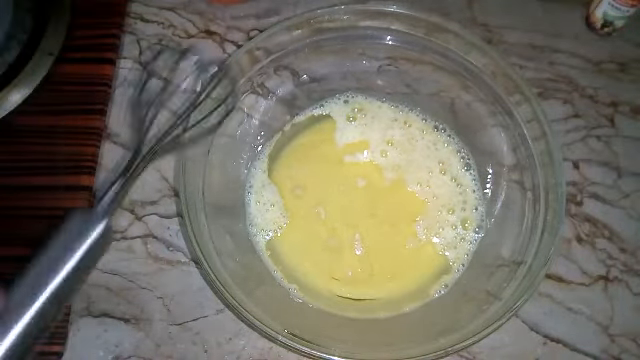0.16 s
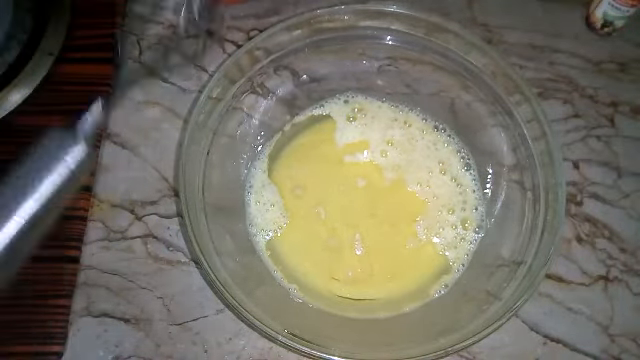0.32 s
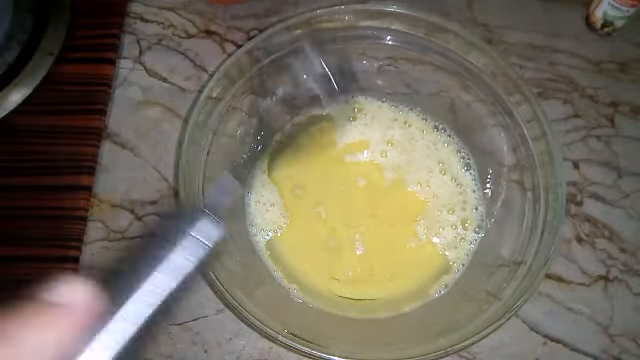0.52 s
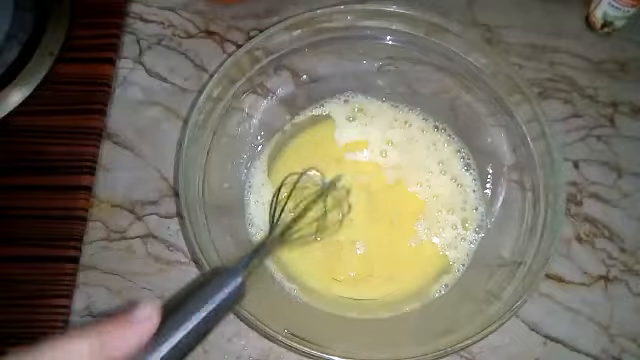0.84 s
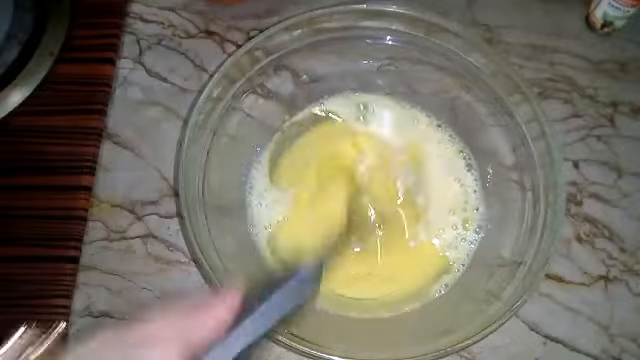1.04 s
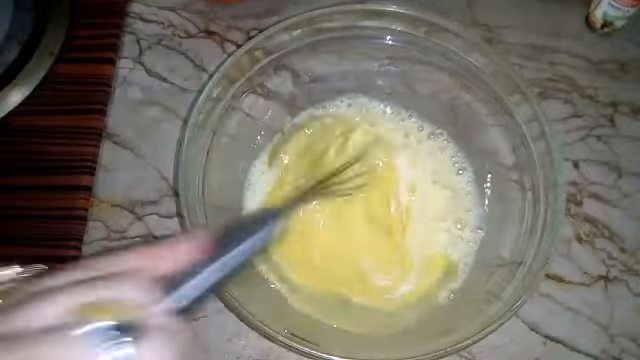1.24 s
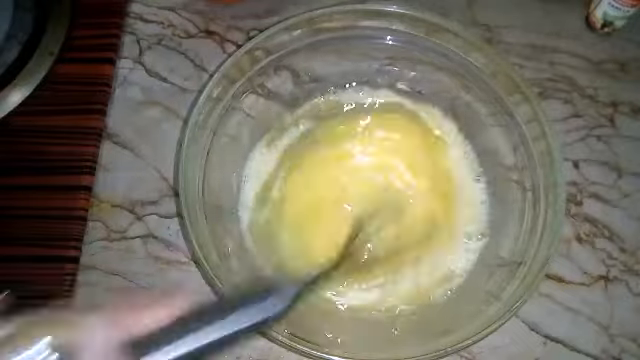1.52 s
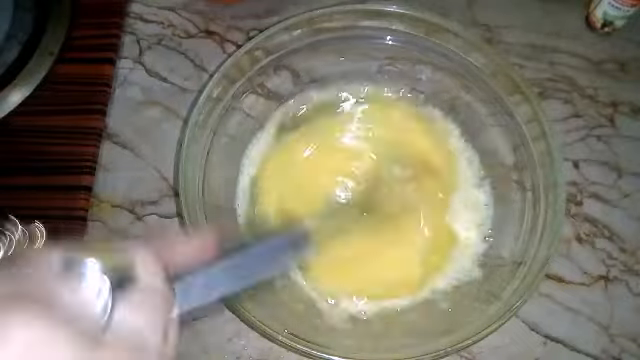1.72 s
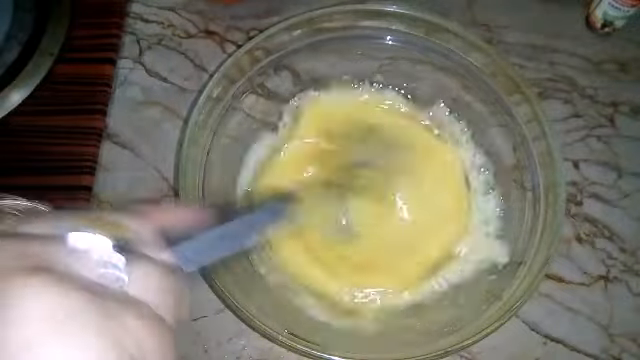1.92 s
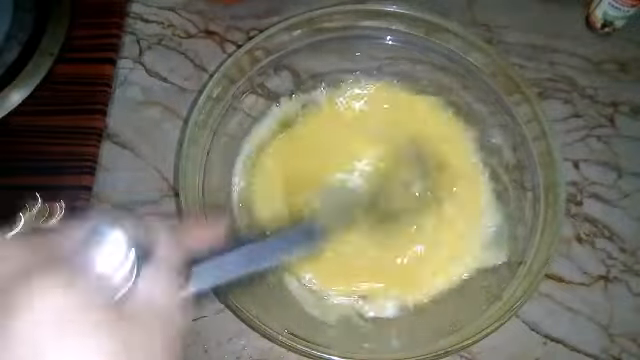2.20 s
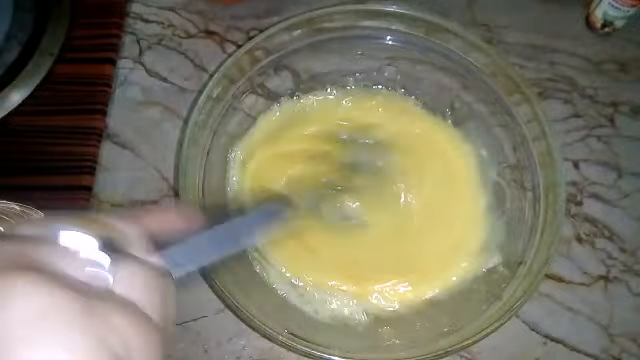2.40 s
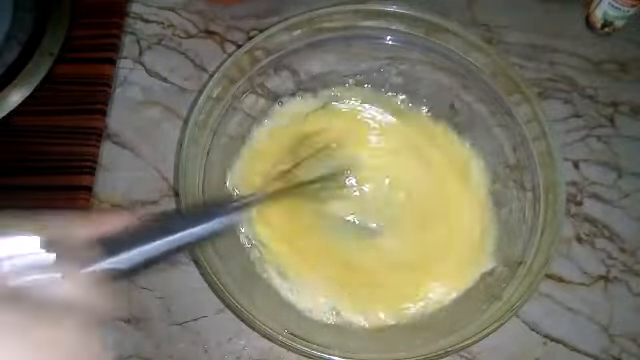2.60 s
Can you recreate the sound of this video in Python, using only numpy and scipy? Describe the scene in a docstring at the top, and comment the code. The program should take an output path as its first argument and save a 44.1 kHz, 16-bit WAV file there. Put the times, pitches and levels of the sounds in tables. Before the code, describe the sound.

A metal whisk beats eggs in a glass bowl, close up and nearly mono. Around 0.2 s the wires knock the rim with a bright, buzzing ring, touching again faintly near 0.4 s. Small ticks at 0.6-0.7 s and glassy taps near 0.95 s follow. From 1.2 s wet, wiry strokes strengthen, with irregular ticks and plops after 2 s, over faint hum in a small kitchen.

```python
"""A steel whisk knocks on the rim of a glass bowl, touches it again, dips into eggs and beats them.
Decaying modes make the ring; filtered random contacts make the clatter, ticks, taps and drag.
Damped tones make the pings of the wire loops, the bubbles and the plops of trapped air.
A small kitchen answers with decaying noise; room noise and slightly wavering partials of an appliance
hum lie below. It is heard close up and nearly in mono."""
import sys
import numpy as np
from scipy import signal
from scipy.fft import rfft, irfft, next_fast_len
from scipy.io import wavfile
from scipy.ndimage import map_coordinates

SR = 44100
rng = np.random.default_rng(int(sys.argv[2]) if len(sys.argv) > 2 else 0)


def master(y):
    """Save y as 16-bit WAV."""
    cut = np.clip(np.atleast_2d(y).T, -1, 1)
    pcm = np.round(cut * 32767)  # scale
    wavfile.write(sys.argv[1], SR, pcm.astype(np.int16))


N = 121275  # length in samples

# relative spectrum of the ticks and drag: frequency_hz, level_db
WIRE_SPECTRUM = [(300, -38.5), (1100, -6.5), (1900, -54), (2450, 0.5), (2850, -7), (3800, 4), (4500, -3.5),
                 (6000, 3), (6600, 8), (7400, -6.5), (9000, -21), (11000, -53)]


def amp(db):
    """Level law: decibels to amplitude ratio."""
    return 10 ** (np.asarray(db) / 20)


def unit(x):
    """Power normalisation: scale to rms 1."""
    return x / np.sqrt(np.mean(x ** 2) + 1e-20)


def since(start_s):
    """Elapsed time in seconds since start_s, zero before it."""
    return np.maximum(np.arange(N) / SR - start_s, 0)


def wobble(rate):
    """Slow random modulation: a smooth curve through rate random knots a second."""
    knots = rng.standard_normal(int(N * rate / SR) + 4)
    return map_coordinates(knots, [since(0) * rate])


def colour(x, points):
    """Minimum-phase filtering through (frequency_hz, level_db) points, keeping the power of white noise."""
    m = 2 * next_fast_len(N)
    hz, db = np.transpose(points)
    log_hz = np.log(np.fft.rfftfreq(m, 1 / SR) + 1)
    gain = unit(amp(np.interp(log_hz, np.log(hz + 1), db)))
    # folding the cepstrum onto positive time makes the filter causal
    cepstrum = irfft(np.log(gain + 1e-6))
    cepstrum[1:m // 2] *= 2
    cepstrum[m // 2 + 1:] = 0
    return irfft(rfft(x, m) * np.exp(rfft(cepstrum)))[:N]


def crackle(rate, spread_db):
    """Shot noise: random contacts, rate a second, of uneven size and either sign, rms 1."""
    size = amp(spread_db * np.minimum(rng.exponential(size=N), 4))
    contact = rng.random(N) < rate / SR
    return unit(contact * size * rng.choice([-1, 1], N))


def damped_tone(t, hz, rise, t60, attack):
    """Damped oscillator: a decaying sine whose pitch climbs by the fraction rise each second."""
    tone = np.sin(2 * np.pi * hz * t * (1 + rise * t / 2))
    return tone * amp(-60 * t / t60) * (1 - np.exp(-t / attack))


def swells(rows):
    """Power summation of pushes, each growing exponentially to its crest and falling away quickly."""
    RELEASE_S = 0.013  # time constant
    t = since(0)
    power = 0
    for crest_s, db, swell_s in rows:
        shape = np.exp(np.minimum((t - crest_s) / swell_s, (crest_s - t) / RELEASE_S))
        power = power + (amp(db) * shape) ** 2
    return np.sqrt(power)


def stirring():
    """Steady excitation: the constant envelope of a faint churn once the whisk is in."""
    STIR_FROM_S, STIR_DB = 1, -65.5
    return (since(STIR_FROM_S) > 0) * amp(STIR_DB)


def background():
    """Additive and filtered-noise synthesis: wavering hum partials of an appliance over room noise."""
    AIR_DB = -58  # rms level
    # relative spectrum of the room noise: frequency_hz, level_db
    air_spectrum = [(25, -13.5), (60, -9), (108, 1.5), (330, -10.5), (520, -9), (1050, -11.5), (2100, -20),
                    (6600, -17), (7800, -33), (9000, -60.5)]
    # partials of the appliance: pitch_hz, rms_level_db, waver_depth (0-1)
    hum_partials = [(99.7, -63, 0.1), (148.1, -69, 0), (524.3, -65, 0.25)]
    hum = np.zeros(N)
    for hz, db, waver in hum_partials:
        level = amp(db) * np.sqrt(2) * (1 + waver * wobble(12.08))
        hum += level * np.sin(2 * np.pi * hz * since(0) + 0.59 * wobble(5.82))
    return hum + amp(AIR_DB) * colour(rng.standard_normal(N), air_spectrum)


def kitchen(x):
    """Reverberation by convolution with decaying noise: the short, slightly dull answer of counter and walls."""
    KITCHEN_T60_S = 0.081
    # relative response of the room: frequency_hz, level_db
    wall_response = [(200, -5), (6500, -1), (15000, -11)]
    t = np.arange(SR // 2) / SR
    tail = rng.standard_normal(len(t)) * amp(-60 * t / KITCHEN_T60_S) * (t > .002)
    echo = signal.fftconvolve(x, tail / np.linalg.norm(tail))[:N]
    return colour(echo, wall_response)


def froth(centre_hz):
    """Superposed bubble resonances: a swarm of small rising tones around one pitch, rms 1."""
    BUBBLES_PER_S, BUBBLE_CYCLES = 600, 31  # the cycles fall by 60 dB
    BUBBLE_SPREAD = 0.46  # largest pitch deviation either way, natural log of the ratio
    swarm, t = np.zeros(N + SR), np.arange(SR // 20) / SR
    for when, pitch, size in rng.random((int(BUBBLES_PER_S * N / SR), 3)):
        hz = centre_hz * np.exp(BUBBLE_SPREAD * (2 * pitch - 1))
        bubble = damped_tone(t, hz, 9.3, BUBBLE_CYCLES / hz, 0.0004)
        swarm[int(when * N):][:len(t)] += amp(10 * size) * bubble
    return unit(swarm[:N])


def liquid():
    """Bubble resonance: churned egg, gurgles as it folds into the hollow, and larger plops of air."""
    BUBBLE_HZ, SLOSH_DB = 784, -6  # the slosh is relative to the stirring envelope
    GURGLE_SWELL_S, PLOP_RISE_S = 0.022, 0.0059  # time constants
    # egg folding back into the hollow: crest_s, level_db, bubble_pitch_hz
    gurgle_events = [(1.929, -55.5, 870), (1.943, -53.5, 1770), (2.117, -49, 1640), (2.715, -59, 920)]
    # air pockets: start_s, level_db, pitch_hz, pitch_rise_per_s, t60_s
    air_pockets = [(0.856, -46, 1010, 2.8, 0.097), (2.048, -35, 1377, 19, 0.048),
                   (2.113, -24, 780, 3.7, 0.021), (2.355, -25, 716, 4.7, 0.034),
                   (2.463, -34.5, 1133, 1.8, 0.041), (2.565, -20, 2905, 14, 0.027)]
    sound = amp(SLOSH_DB) * stirring() * froth(BUBBLE_HZ)
    for crest_s, db, hz in gurgle_events:
        sound += swells([(crest_s, db, GURGLE_SWELL_S)]) * froth(hz)
    for start_s, db, hz, rise, t60 in air_pockets:
        sound += amp(db) * damped_tone(since(start_s), hz, rise, t60, PLOP_RISE_S)
    return sound


def wire_loops(x):
    """Resonant filtering: contacts given the broad colour of ticks and drag, one resonance ringing on."""
    LOOP_HZ, LOOP_Q, LOOP_GAIN = 3920, 15.4, 0.56
    b, a = signal.iirpeak(LOOP_HZ, LOOP_Q, fs=SR)
    return colour(x + LOOP_GAIN * signal.lfilter(b, a, x), WIRE_SPECTRUM)


def drag():
    """Friction as many small impacts: wet clicks and brief loop pings as the whisk pulls through foam."""
    CLICKS_PER_S, CLICK_SPREAD_DB = 1200, 0.5
    PINGS_PER_S, PING_T60_S, PING_DB = 420, 0.041, -1.5  # level relative to the clicks
    PING_HZ, PING_SPREAD = (3675, 5440, 6520), 0.1506  # three clusters, largest relative deviation
    PING_SIZE_DB, CLUMP_DB = 15, 2.8  # range of ping sizes; depth of the random level changes
    # pulls of the whisk through the egg: crest_s, level_db, swell_time_s
    pulls = [(1.185, -54, 0.07), (1.325, -48, 0.03), (1.46, -48, 0.073), (1.555, -48.5, 0.04),
             (1.65, -46, 0.048), (1.775, -50.5, 0.092), (1.9, -44, 0.096), (2.115, -45, 0.2),
             (2.24, -44, 0.05), (2.33, -41.5, 0.05), (2.475, -42, 0.081), (2.555, -42, 0.07),
             (2.74, -42, 0.081)]
    pings, t = np.zeros(N + SR), np.arange(SR // 10) / SR
    for when, loop, pitch, size in rng.random((int(PINGS_PER_S * N / SR), 4)):
        hz = PING_HZ[int(loop * len(PING_HZ))] * (1 + PING_SPREAD * (2 * pitch - 1))
        ping = damped_tone(t, hz, 0, PING_T60_S, 0.00038)
        pings[int(when * N):][:len(t)] += amp(PING_SIZE_DB * size) * ping
    clicks = unit(wire_loops(crackle(CLICKS_PER_S, CLICK_SPREAD_DB)))
    texture = clicks + amp(PING_DB) * unit(colour(pings[:N], WIRE_SPECTRUM))
    envelope = np.hypot(swells(pulls), stirring())
    return envelope * unit(texture * amp(CLUMP_DB * wobble(110)))


def contact_envelope(start_s, db, t60):
    """Exponential decay: a burst that starts at once and falls by 60 dB in t60 seconds."""
    return (since(start_s) > 0) * amp(db - 60 * since(start_s) / t60)


def wire_ticks():
    """Impact excitation: quick runs of tiny contacts, bright on bare glass, duller under the egg."""
    TAP_DB, TAP_T60_S = 2, 0.04  # gain added to every tap; decay
    TICK_T60_S, LOOP_SPLIT_HZ = 0.035, 4600  # decay; border between low and high modes
    # wires tapping bare glass: start_s, level_db (before TAP_DB)
    bare_taps = [(0.9589, -33.5), (0.961, -37), (1.379, -41.5), (1.6112, -47.5), (1.632, -46),
                 (2.3208, -38), (2.352, -35), (2.355, -31), (2.413, -43)]
    # wires flicking the glass under the egg: start_s, low_modes_db, high_modes_db (before filtering)
    egg_ticks = [(0.606, -52.5, -52), (0.699, -51.5, -55), (0.727, -52.5, -55.5), (1.175, -45.5, -38),
                 (1.294, -40.5, -41.5), (1.309, -42, -43.5), (1.38, -36, -34.5), (1.449, -42, -52),
                 (1.5479, -39, -47), (1.6142, -48, -40), (1.735, -53, -43), (1.878, -35.5, -42.5),
                 (2.017, -43, -40), (2.084, -45, -41), (2.101, -40, -37), (2.115, -36, -35.5),
                 (2.206, -38.5, -40), (2.229, -41, -36), (2.412, -34.5, -35), (2.4526, -37, -32),
                 (2.463, -36, -46), (2.577, -46, -34.5), (2.686, -40, -36), (2.698, -41.5, -54),
                 (2.7279, -34, -44)]
    # relative spectrum of a tap: frequency_hz, level_db
    tap_spectrum = [(200, -24), (800, -7), (1900, -14.5), (3500, -10), (6600, 6.5), (7800, -8),
                    (12000, -17.5), (15500, -12.5)]
    taps = sum(contact_envelope(s, db + TAP_DB, TAP_T60_S) for s, db in bare_taps)
    low = sum(contact_envelope(s, low_db, TICK_T60_S) for s, low_db, _ in egg_ticks)
    high = sum(contact_envelope(s, high_db, TICK_T60_S) for s, _, high_db in egg_ticks)
    loops = np.zeros(N)
    for kind, envelope in (("low", low), ("high", high)):
        half = signal.butter(4, LOOP_SPLIT_HZ, kind, fs=SR, output="sos")
        loops += signal.sosfilt(half, envelope * crackle(9000, spread_db=-3.0))
    return wire_loops(loops) + colour(taps * crackle(12000, spread_db=1.5), tap_spectrum)


def glass_mode(t, hz, buzz_depth):
    """Beating of near-degenerate modes: an unsteady partial with a weaker twin close by in pitch."""
    CHATTER_S = 0.12  # time constant of the buzz
    buzz = wobble(261.4) * (buzz_depth * np.exp(-t / CHATTER_S))
    twin_hz = hz + rng.uniform(21, 70) * rng.choice([-1, 1])
    twin = 0.25 * np.sin(2 * np.pi * twin_hz * t + 2 * np.pi * rng.random())
    partial = np.sin(2 * np.pi * hz * t + 0.097 * wobble(109.3))
    return (1 + buzz) * (partial + twin)


def rim_knocks():
    """Modal synthesis: wires chatter on the rim while the glass rings; each contact favours some modes."""
    CLATTER_T60_S, CLATTER_HOLD_S, CLATTER_DB = 0.18, 0.0078, -5.5  # gain added to every clatter
    RING_RISE_S = 0.0035  # time constant
    FAVOURED_OCTAVES = 0.36  # standard deviation of the favoured range
    # a knock, its rebounds, a second touch: start_s, ring_level_db, clatter_level_db (before
    # CLATTER_DB), peak_boost_db of the favoured modes, favoured_pitch_hz
    contacts = [(0.216, -28, -22.5, 11, 6900), (0.263, -56, -50, 28, 5480), (0.278, -56.5, -50, 16, 3940),
                (0.3858, -48, -45, 20, 6100)]
    # modes of bowl and whisk, one row for each pitch below: relative_level_db, t60_s
    mode_decays = [(-21.5, 0.54), (-20, 0.51), (-18, 0.83), (-26.5, .17), (3, 0.27), (-7, .3), (-20, 0.17),
                   (-5, 0.21), (-18, 0.14), (-5.5, 0.14), (-8.5, 0.083), (-11, 0.057), (-12.5, .11)]
    # pitches of these modes: pitch_hz
    mode_pitches = [571, 1170, 1384, 1954, 2503, 3860, 4961, 5384, 5440, 7040, 8900, 10950, 15300]
    # relative spectrum of the loose wires: frequency_hz, level_db
    clatter_spectrum = [(200, -23.5), (750, -28), (1350, -11), (2100, -26.5), (4200, -12), (7000, -8),
                        (7900, -22), (16000, -41.5)]
    ring, chatter = np.zeros(N), np.zeros(N)
    for start_s, ring_db, clatter_db, boost_db, favoured_hz in contacts:
        t = since(start_s)
        for hz, (db, t60) in zip(mode_pitches, mode_decays):
            octaves = np.log2(hz / favoured_hz)
            boost = boost_db * np.exp(-(octaves / FAVOURED_OCTAVES) ** 2 / 2)
            gain = amp(ring_db + db + boost - 60 * t / t60) * (1 - np.exp(-t / RING_RISE_S))
            ring += gain * glass_mode(t, hz, buzz_depth=0.47)
        fall_db = 60 * since(start_s + CLATTER_HOLD_S) / CLATTER_T60_S
        envelope = (t > 0) * amp(clatter_db + CLATTER_DB - fall_db)
        chatter += envelope * crackle(7000, spread_db=2)
    return ring + colour(chatter, clatter_spectrum)


def scene():
    """Mid-side superposition: all sources in the middle, a trace of room at the sides, the rim driest."""
    RING_ROOM_DB, KITCHEN_DB, WIDTH_DB = -22, -9.5, -31  # room sends of rim and egg; side level
    rim = rim_knocks()
    egg = wire_ticks() + drag() + liquid()
    room = kitchen(amp(RING_ROOM_DB) * rim + amp(KITCHEN_DB) * egg)
    mid = rim + egg + room + background()
    side = amp(WIDTH_DB) * kitchen(mid)
    return np.array([mid + side, mid - side])


def record(dry):
    """Band limiting: every spectral component at or above the limit is removed."""
    TOP_HZ = 15600
    m = next_fast_len(N + SR // 2)
    passband = np.fft.rfftfreq(m, 1 / SR) < TOP_HZ
    return irfft(rfft(dry, m) * passband, m)[:, :N]


dry = scene()
out = record(dry)
master(out)
```